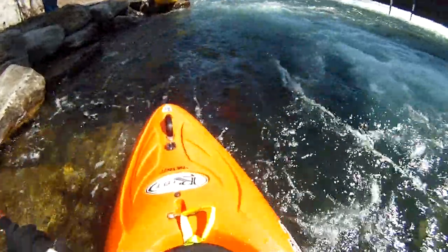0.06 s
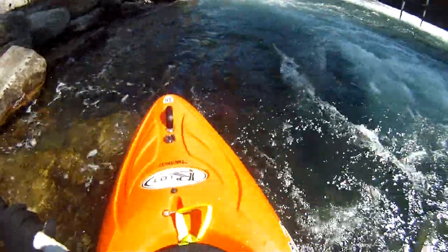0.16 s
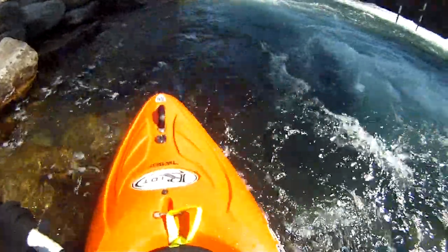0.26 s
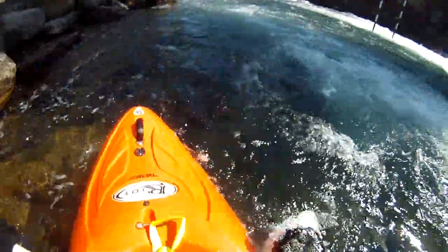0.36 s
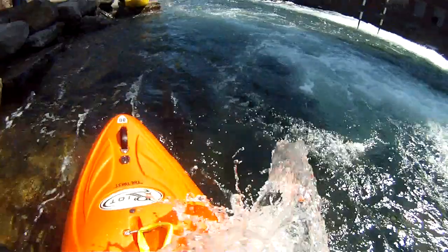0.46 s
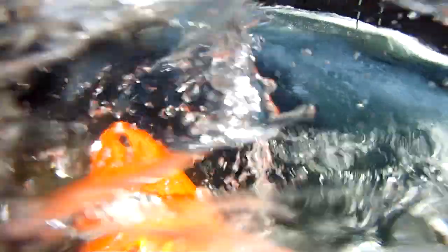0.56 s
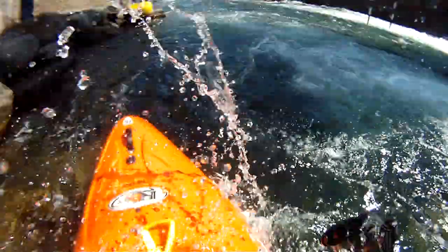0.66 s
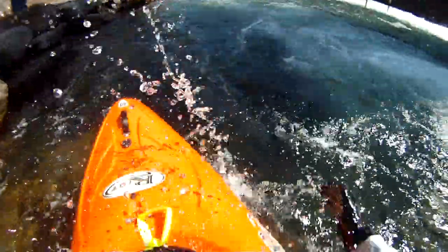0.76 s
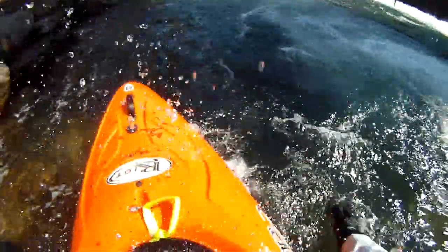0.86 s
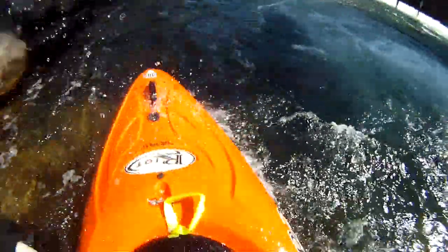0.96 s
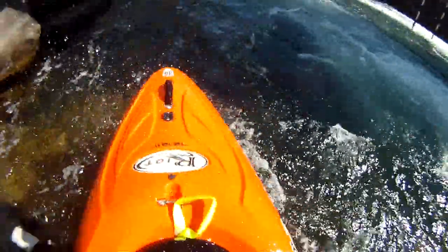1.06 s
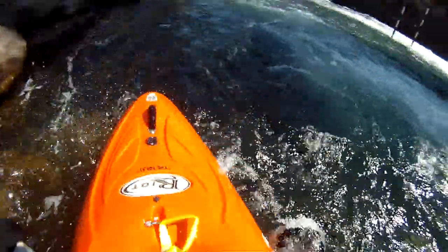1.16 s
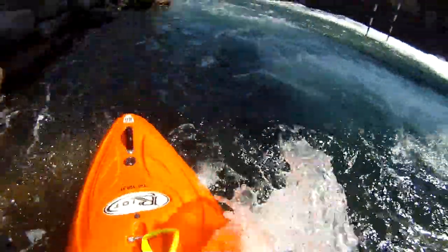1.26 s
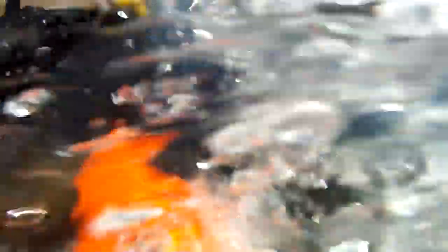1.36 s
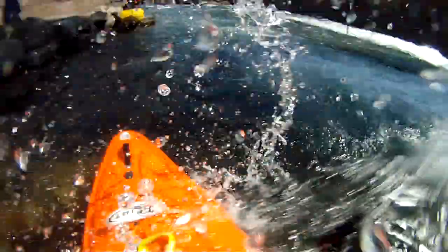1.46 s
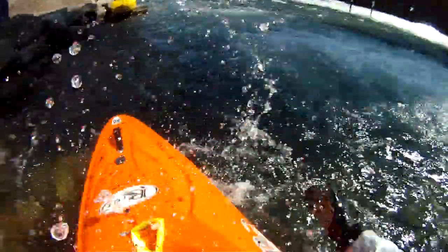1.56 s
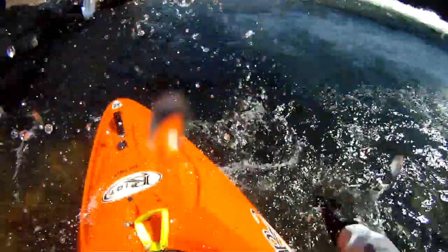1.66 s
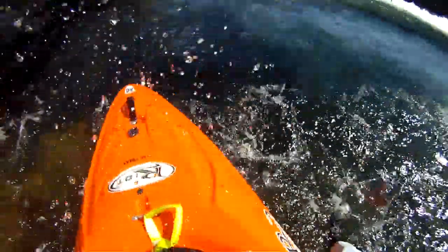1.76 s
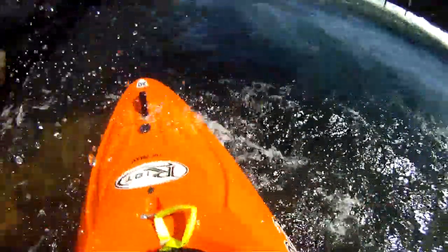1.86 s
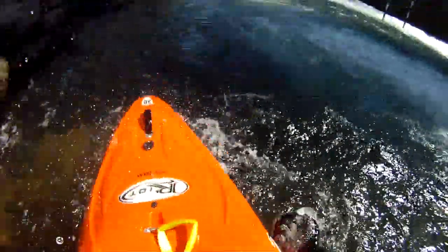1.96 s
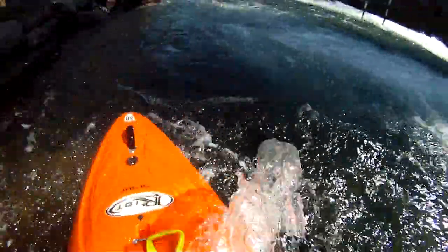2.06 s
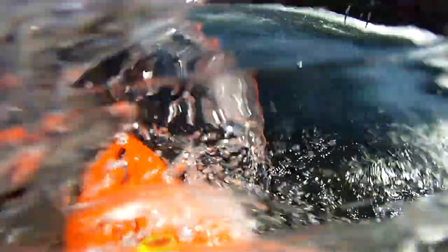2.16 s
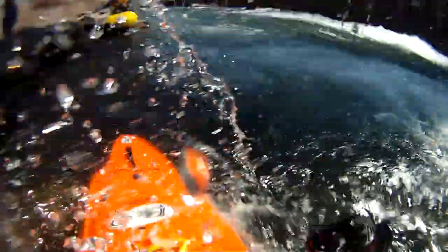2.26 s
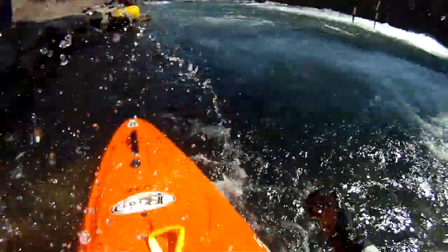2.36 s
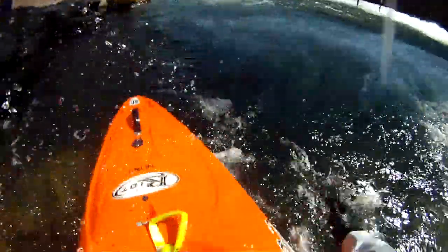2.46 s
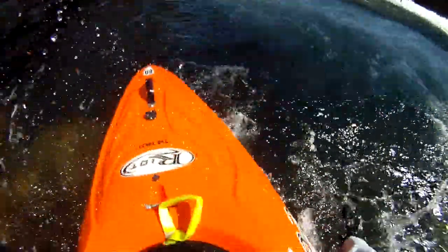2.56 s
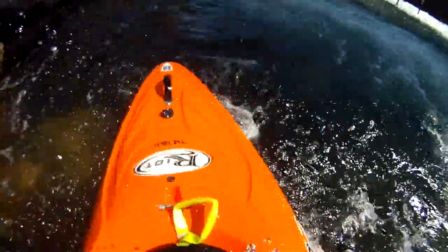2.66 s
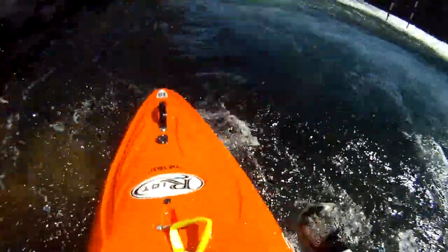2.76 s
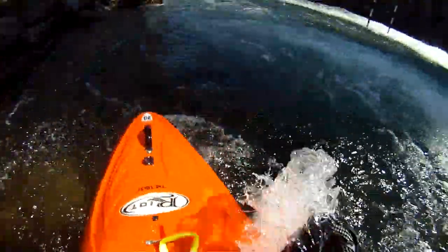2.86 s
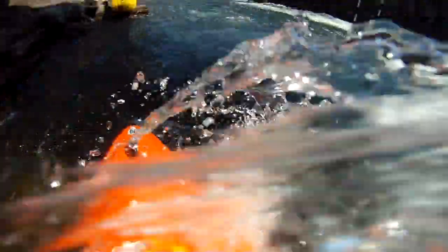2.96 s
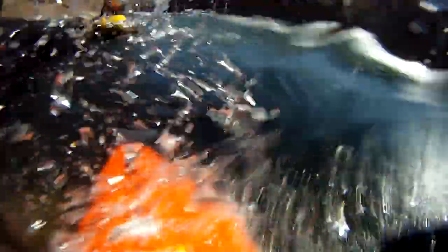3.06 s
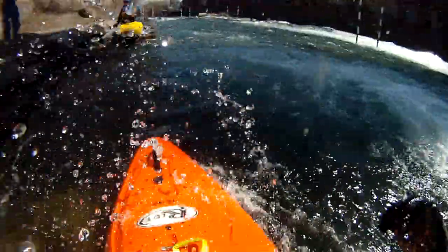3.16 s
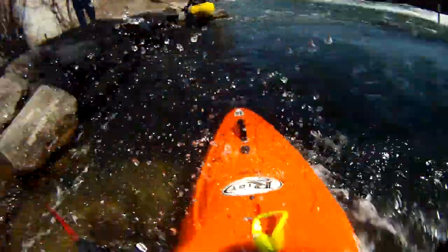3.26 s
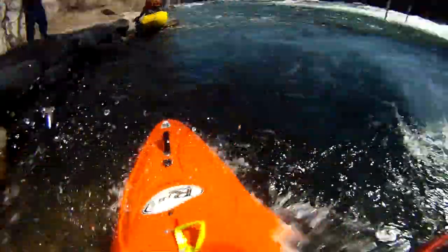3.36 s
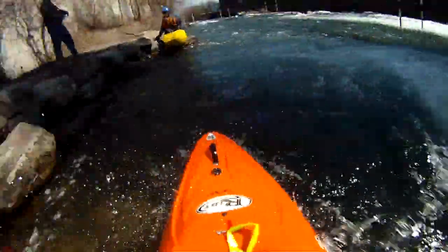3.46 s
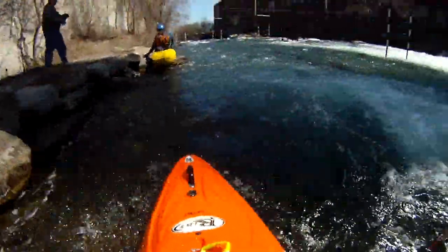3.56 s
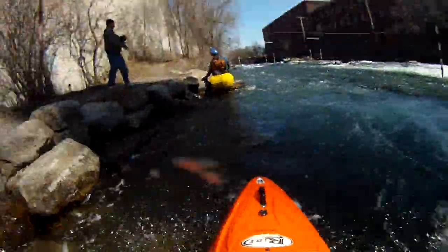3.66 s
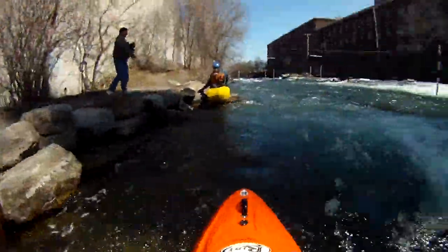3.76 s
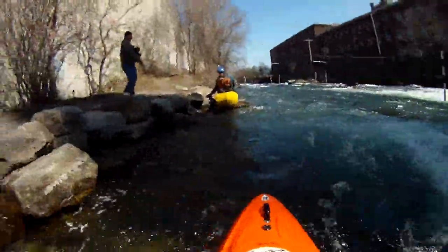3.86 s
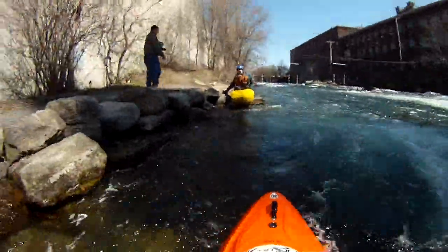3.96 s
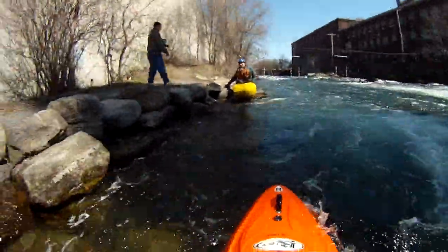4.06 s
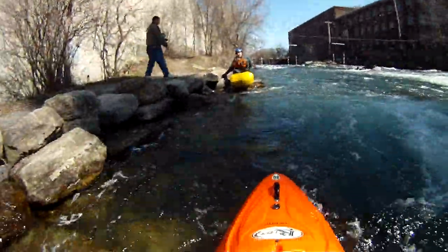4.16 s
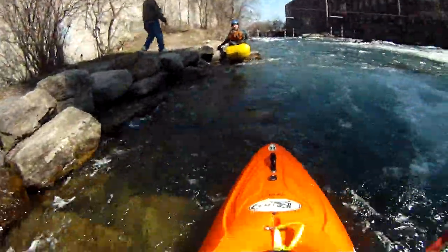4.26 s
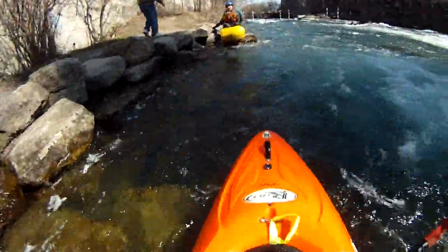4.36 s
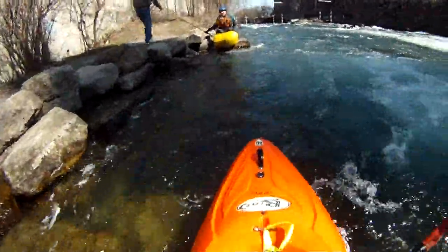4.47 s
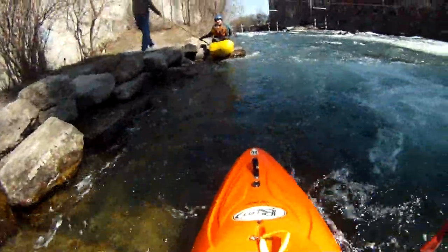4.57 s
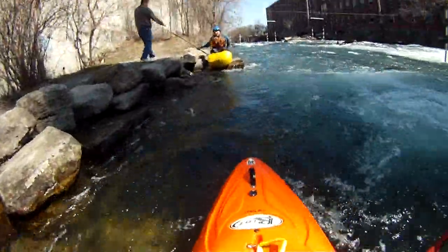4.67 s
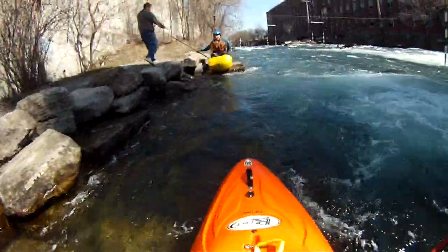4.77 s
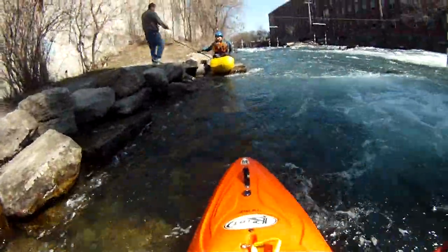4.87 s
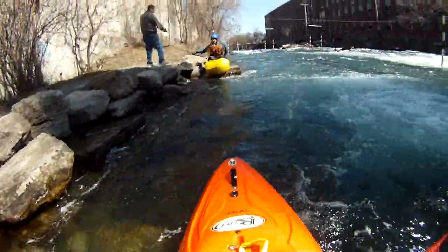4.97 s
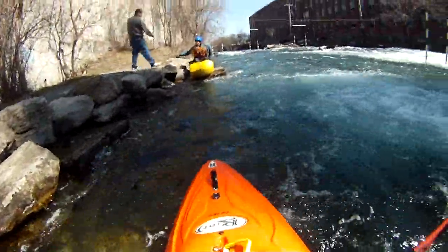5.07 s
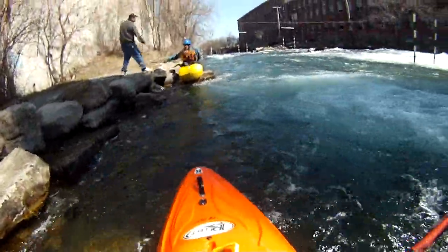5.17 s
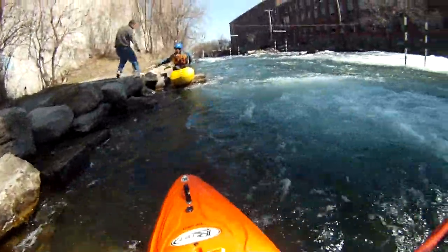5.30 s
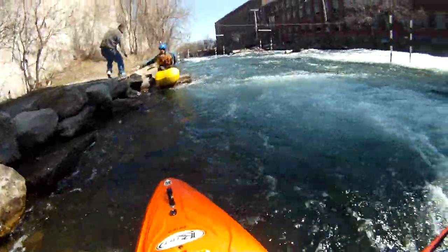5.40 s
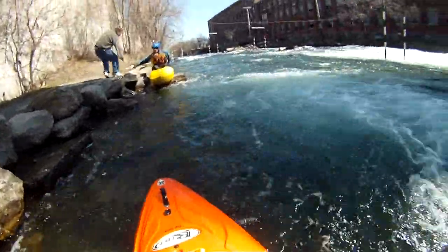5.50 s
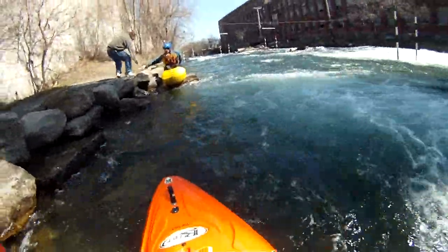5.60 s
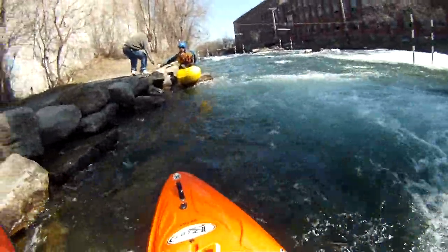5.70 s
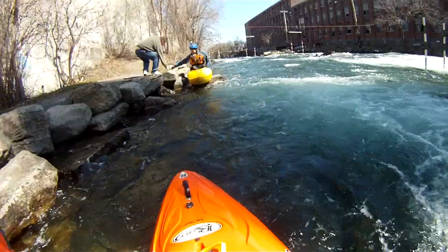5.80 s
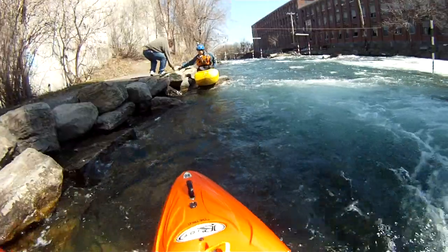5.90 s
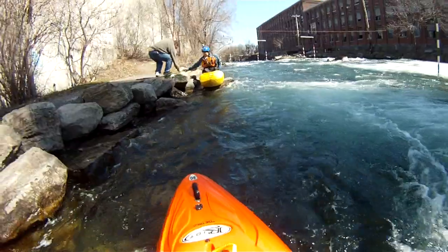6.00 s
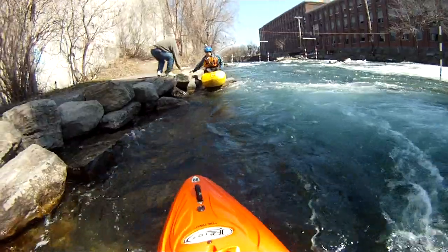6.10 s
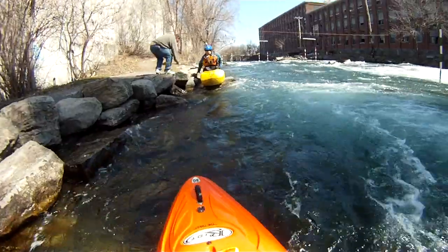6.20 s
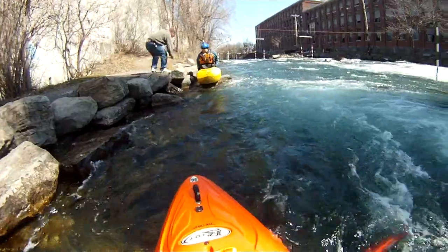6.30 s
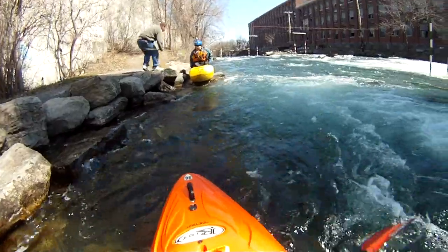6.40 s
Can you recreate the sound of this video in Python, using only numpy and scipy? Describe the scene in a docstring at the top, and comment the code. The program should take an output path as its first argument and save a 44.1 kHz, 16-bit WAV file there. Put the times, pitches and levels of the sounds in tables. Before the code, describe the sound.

Whitewater rapids roar steadily throughout, fairly quiet and boxy, heard from inside a waterproof case on a kayak. Four paddle strokes throw water onto the case at about 0.7, 1.4, 2.3 and 3.1 seconds. Each begins with a faint hiss of the blade entering, then a quick burst of spray and a loud, sharp slap with a dull thump through the hull. The hardest slaps distort slightly and briefly duck the river. The first two trail off in fizzy drizzle, while the last two are shorter. Large drops tap the case between strokes, and a sharp bubble plop stands out near 1.9 seconds. Around 3.5 seconds the current rumbles against the hull, with a few small plops. From 4 seconds until the end at about 6.4, the river continues with only occasional soft knocks, drips and a faint plop.

```python
"""Four kayak paddle strokes in whitewater, heard from inside a waterproof case.
Each blade hisses in, a sheet of spray slaps the case, drizzle trails off and thrown water
rains back on the river. Rapids roar steadily, bubbles plop, large drops tap the case,
and knocks and surges come through the hull.
The hardest slaps clip; gain control then ducks the river."""
import sys
import numpy as np
from scipy import signal
from scipy.fft import rfft, irfft
from scipy.io import wavfile
from scipy.ndimage import uniform_filter1d

SR = 44100
rng = np.random.default_rng(int(sys.argv[2]) if len(sys.argv) > 2 else 0)


def file_out(sig):
    """Save sig as 16-bit WAV at sys.argv[1]."""
    # one column per channel
    cols = np.atleast_2d(sig).T
    # limit, then scale
    lim = np.clip(cols, -1, 1)
    pcm = np.round(lim * 32767).astype(np.int16)
    wavfile.write(sys.argv[1], SR, pcm)


N = 284004

# Paddle strokes: (slap time [s], slap body over 5 ms [dB], slap fizz over 5 ms [dB], slap decay [s],
# slap ring [Hz], spray lead [s], spray on arrival [dB], spray at slap [dB], drizzle [dB],
# blade hiss [dB], fall-back [dB])
STROKES = [(0.655, -6.5, -13.5, 0.0019, 1930, .038, -26, -19, -25.5, -56, -56),
           (1.4446, -1.5, -7.5, 0.0018, 1500, 0.03, -25.5, -19.5, -22, -51, -56),
           (2.2627, -2, -11.5, 0.002, 1590, .031, -29.5, -18.5, -51, -60, -64),
           (3.0763, -4, -12.5, 0.0031, 1110, 0.024, -35.5, -26, -42, -56, -61)]


def amp(db):
    """dB to gain."""
    return 10 ** (np.asarray(db) / 20)


def unit(x):
    """Scale to rms 1."""
    return x / np.sqrt(np.mean(x ** 2) + 1e-20)


def spectrum_at(points, hz):
    """Spectrum in dB, interpolated over log frequency."""
    point_hz, db = np.transpose(points)
    return np.interp(np.log(hz + 1), np.log(point_hz + 1), db)


def level(rows):
    """Level curve to gain per sample."""
    time_s, db = np.transpose(rows)
    return amp(np.interp(np.arange(N) / SR, time_s, db))


def add(mix, time_s, sound):
    """Mix a sound in at time_s."""
    part = mix[max(round(time_s * SR), 0):][:len(sound)]
    part += sound[:len(part)]


def lag(x, tau_s):
    """One-pole low-pass."""
    pole = np.exp(-1 / (tau_s * SR))
    return signal.lfilter([1 - pole], [1, -pole], x)


def wander(tau_s):
    """Smoothed noise, rms 1."""
    return unit(lag(lag(rng.standard_normal(N), tau_s), tau_s))


def dying(t, decay_s):
    """Exponential decay from t = 0, silent before."""
    return (t >= 0) * np.exp(-np.abs(t) / decay_s)


def minimum_phase(db):
    """Causal impulse response of a gain curve."""
    log_gain = np.r_[db, db[-2:0:-1]] * np.log(10) / 20
    return np.fft.ifft(np.exp(np.conj(signal.hilbert(log_gain)))).real[:len(db)]


def case_db(hz):
    """Colour of the case: bell-shaped peaks and dips."""
    # Resonances and notches: (centre [Hz], half width [Hz], gain [dB])
    bells = [(1273, 18, 3), (2140, 298, 6), (3626, 563, 10.5), (5070, 430, 5), (5990, 248, -33),
             (6921.0, 420, 5), (8440, 350, 8), (9790, 375, 9), (11990, 860, -24.5), (14230, 320, 5.5)]
    return sum(db * np.exp(-((hz - centre_hz) / width_hz) ** 2) for centre_hz, width_hz, db in bells)


def rapids(patch_db=1.0, flicker_db=0.47, size=512):
    """Countless far bubbles merge to a roar, with brief patches where single waves break."""
    # Roar spectrum: (frequency [Hz], relative density [dB])
    colour = [(40.0, -14), (130.0, 0.5), (350.0, -3), (700.0, -7), (1250.0, -1), (1700.0, -1.5),
              (2400.0, 0), (2650.0, -7.5), (3700.0, -16), (4300.0, -22), (7500.0, -24), (10000.0, -15.5),
              (14300.0, -17), (15200.0, -19.5)]
    # Roar envelope: (time [s], level [dB])
    flow = [(0, -44.5), (.5, -44), (4.8, -44), (5.3, -43), (5.8, -44.5), (6.44, -44.5)]
    hz = np.fft.rfftfreq(size, 1 / SR)
    framing = dict(nperseg=size, noverlap=size - size // 4)
    frames = signal.stft(rng.standard_normal(N), **framing)[2].T
    patches = uniform_filter1d(rng.standard_normal(frames.shape), size=14, axis=0)
    patches = unit(uniform_filter1d(patches, size=8, axis=1))
    flicker = unit(uniform_filter1d(rng.standard_normal(len(frames)), size=6))[:, None]
    frames *= amp(spectrum_at(colour, hz) + case_db(hz) + patch_db * patches + flicker_db * flicker)
    return level(flow) * unit(signal.istft(frames.T, **framing)[1][:N])


def surge(gain_db=1, lump_db=3, lump_s=0.01):
    """The current rumbles against the hull in soft, irregular bumps."""
    # Surge envelope: (time [s], level before gain_db [dB])
    swells = [(0.0, -57), (0.55, -52), (0.72, -44.5), (1.16, -54.5), (1.58, -50), (1.85, -47),
              (2.11, -46.5), (2.42, -56), (3.57, -39.5), (3.84, -49), (4.03, -56), (6.44, -64)]
    # Surge spectrum: (frequency [Hz], relative density [dB])
    colour = [(10, -1), (25, -5.5), (55, -10.5), (105, -8), (170, -26.5), (350, -25.5), (900, -77)]
    hz = np.fft.rfftfreq(N, 1 / SR)
    lumps = amp(lump_db * np.minimum(wander(lump_s), 1.8))
    rumble = irfft(rfft(lumps * rng.standard_normal(N)) * amp(spectrum_at(colour, hz)), N)
    return amp(gain_db) * level(swells) * unit(rumble)


def bubbles(glide_per_decay=0.034):
    """Each bubble rings and rises in pitch as it nears the surface."""
    # Plops beside the boat: (time [s], peak [dB], start pitch [Hz], decay [s])
    plops = [(0.159, -40, 3500, 0.0087), (1.882, -16.5, 2180, 0.0026), (2.686, -37, 2190, .006),
             (3.288, -37, 1900, 0.0035), (3.555, -33, 2030, 0.024), (3.739, -33.5, 866, 0.0082),
             (3.752, -37.5, 1370, 0.0071), (5.686, -32.5, 2060, 0.006)]
    t, out = np.arange(3000) / SR, np.zeros(N)
    for time_s, db, hz, decay_s in plops:
        cycles = np.cumsum(hz * (1 + glide_per_decay * t / decay_s)) / SR
        add(out, time_s, amp(db) * np.exp(-t / decay_s) * np.sin(2 * np.pi * cycles))
    return out


def sprinkle_gain(floor_db=-68.5, blade_lead_s=0.17, blade_width_s=0.036,
                  flight_s=0.38, fall_width_s=0.081):
    """Two showers per stroke, over the river's own fine drops: blade entry, then thrown water landing."""
    t, power = np.arange(N) / SR, amp(floor_db) ** 2
    for slap_s, *_, blade_db, fall_db in STROKES:
        power += amp(blade_db) ** 2 * np.exp(-((t - slap_s + blade_lead_s) / blade_width_s) ** 2)
        power += amp(fall_db) ** 2 * np.exp(-((t - slap_s - flight_s) / fall_width_s) ** 2)
    return np.sqrt(power)


def sprinkle(rate_per_s=1100, spread_db=4.0, decay_cycles=6, band_hz=(4200, 9000), pitches=28):
    """Tiny drops fall on the river, each ringing a small bubble."""
    t, out = np.arange(700) / SR, np.zeros(N)
    sizes = amp(spread_db * np.minimum(rng.exponential(1, N), 3.5))
    impacts = sizes * (rng.random(N) < rate_per_s / SR)
    pitch_index = rng.integers(0, pitches, N)
    for k, hz in enumerate(np.geomspace(*band_hz, pitches)):
        envelope = (1 - np.exp(-t * hz)) * np.exp(-t * hz / decay_cycles)
        ping = amp(case_db(hz)) * envelope * np.sin(2 * np.pi * hz * t)
        out += signal.oaconvolve(impacts * (pitch_index == k), ping)[:N]
    return sprinkle_gain() * unit(out)


def thumps(heave_ratio=0.62, lead_s=0.2):
    """Water pushes hull and mount into a swing that builds, then dies; the whole hull heaves below it."""
    # Pushes: (peak time [s], level [dB], main frequency [Hz], swell [s], decay [s], relative heave [dB])
    pushes = [(.652, -12, 107.7, 0.041, 0.013, -4), (1.444, -9, 111.6, 0.029, 0.014, -3),
              (1.491, -18.5, 115, 0.0054, 0.024, -22), (1.627, -33.5, 199, 0.0043, 0.0093, 0),
              (1.842, -34, 112, 0.0061, .016, -19), (2.261, -5, 105, 0.033, 0.0028, -13),
              (3.078, -6, 171, 0.0043, 0.0077, 0), (3.421, -24, 35.3, 0.034, 0.006, -9),
              (3.996, -35.5, 67, .012, 0.019, -10), (4.673, -42, 100, .012, .012, -9),
              (4.955, -42.5, 103, .009, 0.026, -14), (5.082, -32.5, 118, 0.0099, 0.0094, -9)]
    # Swing modes: (frequency [x main], gain [dB], time scale [x swell and decay])
    modes = [(1, -0.5, 0.88), (1.9, -12, 0.49), (3.2, -23, 0.24)]
    t, out = np.arange(-lead_s, 2 * lead_s, 1 / SR), np.zeros(N)
    for peak_s, db, hz, swell_s, decay_s, heave_db in pushes:
        for ratio, mode_db, time_scale in [(heave_ratio, heave_db, 1)] + modes:
            rise = np.clip(1 + t / (time_scale * swell_s), 0, 1)
            fall = np.exp(-np.maximum(t, 0) / (time_scale * decay_s))
            swing = -np.cos(2 * np.pi * ratio * hz * t)
            add(out, peak_s - lead_s, amp(db + mode_db) * rise * fall * swing)
    return out


def splat_responses(ring_hz=2100, ring_db=0, low_cut_hz=100, high_ring_hz=7000,
                    ring_width_hz=300, split_hz=4200):
    """Body and fizz responses of the case to a drop; ring_db adds the notes of trapped air."""
    # Water landing on the case: (frequency [Hz], relative density [dB])
    impact = [(100.0, 1), (300.0, -1.5), (520.0, -8), (670, -2.5), (850, -3), (1150, 0), (2000.0, -4.5),
              (2800.0, -5.5), (4300.0, -13.5), (7500.0, -23), (11000.0, -21), (15300.0, -20)]
    hz = np.fft.rfftfreq(2048, 1 / SR) + 1
    db = spectrum_at(impact, hz) + np.maximum(case_db(hz), -15)  # direct hits partly bypass the notches
    db -= 10 * np.log10(1 + (low_cut_hz / (hz + 50)) ** 4)
    db += sum(ring_db / (1 + ((hz - note) / ring_width_hz) ** 2) for note in (ring_hz, high_ring_hz))
    crossover = (hz / split_hz) ** 10
    body_db = db - 20 * np.log10(1 + crossover)
    fizz_db = db + 20 * np.log10(crossover / (1 + crossover) + amp(-64.5))
    return minimum_phase(body_db), minimum_phase(fizz_db)


def splat(body_db, fizz_db, decay_s, ring_hz, stretch=1.39, rise_s=0.00035, ring_db=10, heavy_db=-20):
    """Water flattens on the case as a short, lumpy burst of pressure."""
    t = np.arange(1400) / SR
    grains, sizes = rng.standard_normal((2, len(t)))
    envelope = (1 - np.exp(-t / rise_s)) * np.exp(-(t / (stretch * decay_s)) ** 1.005)
    force = envelope * np.sign(grains) * np.exp(0.3 * sizes)
    low_cut_hz = 0.38 * ring_hz / (1 + amp(body_db - heavy_db))  # only heavy water has a low end
    responses = splat_responses(ring_hz, ring_db, low_cut_hz, high_ring_hz=rng.uniform(7530, 11340))
    body, fizz = (signal.fftconvolve(force, response) for response in responses)
    span_gain = np.sqrt(0.005 * SR / len(body))  # energy of each level held for 5 ms
    return span_gain * (amp(body_db) * unit(body) + amp(fizz_db) * unit(fizz))


def drops():
    """Large drops land on the case one by one; the row at 5.085 s is instead the sharp click of a knock against
    the hull."""
    # Drops, plus the click of a knock at 5.085 s: (time [s], body over 5 ms [dB], fizz over 5 ms [dB], decay
    # [s], ring [Hz])
    landings = [(.322, -39, -42.5, 0.0017, 2180), (0.619, -20, -30, 0.0026, 2140),
                (0.666, -12, -16.5, 0.0014, 2010), (0.6753, -8, -12.5, 0.0015, 3670),
                (0.688, -18.5, -27, 0.0014, 2300), (.696, -17.5, -18, 0.0012, 2370),
                (.7035, -22.5, -27, 0.0024, 1900), (1.1424, -41, -43.5, .003, 3700),
                (1.1873, -34, -42, 0.00037, 2000), (1.2703, -36, -46, 0.0045, 2340),
                (1.416, -23, -37, 0.0015, 2180), (1.4535, -17, -23, 0.00098, 3540),
                (1.47, -14, -22, .0039, 3720), (1.476, -15, -20, 0.003, 2510),
                (1.5112, -21.5, -27, 0.00075, 3400), (1.5486, -29.5, -34, 0.00084, 3750),
                (1.569, -34, -42, 0.0015, 2000), (1.615, -34, -43, 0.0023, 2300),
                (1.8285, -24.5, -33.5, 0.0015, 2030), (1.8811, -27.5, -30.5, 0.0028, 1940),
                (2.112, -38, -44, 0.0037, 2220), (2.2405, -21, -27, 0.003, 1920),
                (2.2494, -12.5, -29, 0.0013, 2060), (2.2843, -25, -32, 0.0019, 2120),
                (2.2968, -20.5, -32.5, 0.0021, 2100), (2.323, -36, -45, .0018, 2300),
                (2.373, -32.5, -44, 0.0011, 1130), (2.688, -39, -36.5, .003, 2280),
                (2.921, -35.5, -45, 0.0046, 2010), (3.051, -29, -39, 0.0015, 2170),
                (3.06, -11.5, -20.5, 0.0035, 3380), (3.0908, -13.5, -21, 0.0018, 2520),
                (3.099, -23, -31, 0.0015, 3360), (3.294, -34, -47, 0.0043, 1830),
                (3.482, -31.5, -43, 0.00079, 1830), (3.7529, -29.5, -39, 0.00075, 1450),
                (3.781, -38, -48, 0.0017, 2260), (5.085, -40, -56, 0.0092, 1370),
                (5.332, -40, -44.5, 0.0049, 3400)]
    out = np.zeros(N)
    for time_s, *drop in landings:
        add(out, time_s, splat(*drop))
    return out


def spray_gain(sheet_decay_s=0.0056, drizzle_decay_s=0.075, drip_db=-49, drip_decay_s=1, mist_db=-56.5):
    """Over steady mist, spray starts abruptly, thickens to the slap, then thins to drizzle and drips."""
    power = amp(mist_db) ** 2
    for slap_s, *_, lead_s, arrival_db, peak_db, drizzle_db, _, _ in STROKES:
        t = np.arange(N) / SR - slap_s
        arriving = (t > -lead_s) * (t < 0) * amp(np.interp(t, [-lead_s, 0], [arrival_db, peak_db]))
        power += arriving ** 2
        tails = (peak_db, sheet_decay_s), (drizzle_db, drizzle_decay_s), (drip_db, drip_decay_s)
        for db, decay_s in tails:
            power += (amp(db) * dying(t, decay_s)) ** 2
    return np.sqrt(power)


def spray(base_rate_per_s=300, spread_db=2.5, fizz_db=6, thin_db=-52, clump_db=2, clump_s=0.0015):
    """Droplets of unequal size tick on the case; thick spray is denser, clumped and duller."""
    gain = spray_gain()
    density = np.maximum(gain / amp(thin_db), 1)
    sizes = amp(spread_db * np.minimum(rng.exponential(1, N), 3.5))
    signs = rng.choice([-1, 1], N)
    hits = rng.random(N) < density * base_rate_per_s / SR
    ticks = sizes * signs * hits / np.sqrt(density)
    clumps = np.minimum(wander(clump_s), 1.5) - 0.5
    ticks *= amp(clump_db * clumps * (1 - 1 / density))
    body, fizz = (signal.oaconvolve(ticks, response)[:N] for response in splat_responses())
    return gain * unit(body + amp(fizz_db) * fizz / density ** 0.16)


def slaps():
    """The bulk of the water from each stroke hits the case at once."""
    out = np.zeros(N)
    for slap_s, body_db, fizz_db, decay_s, ring_hz, *_ in STROKES:
        add(out, slap_s, splat(body_db, fizz_db, decay_s, ring_hz))
    return out


def scene():
    """One microphone feeds both channels."""
    mono = rapids() + spray() + sprinkle() + surge() + thumps() + bubbles() + slaps() + drops()
    return np.array([mono, mono])


def record(dry, threshold_db=-16.5, recover_db_per_s=85, sense_s=0.023, react_s=0.036, cutoff_hz=15350):
    """Gain control reacts too late for the slaps, which clip, and ducks what follows; then a low-pass."""
    power_db = 10 * np.log10(lag(dry[0] ** 2, sense_s) + 1e-12)
    recovery_db = np.arange(N) / SR * recover_db_per_s
    held_db = np.maximum.accumulate(power_db + recovery_db) - recovery_db
    duck_db = lag(np.maximum(held_db - threshold_db, 0), react_s)
    clipped = np.clip(dry * amp(-duck_db), -1, 1)
    low_pass = signal.firwin(511, cutoff_hz, window=("kaiser", 7), fs=SR)
    return signal.oaconvolve(clipped, low_pass[None], "same", axes=1)


dry = scene()
out = record(dry)
file_out(out)
```